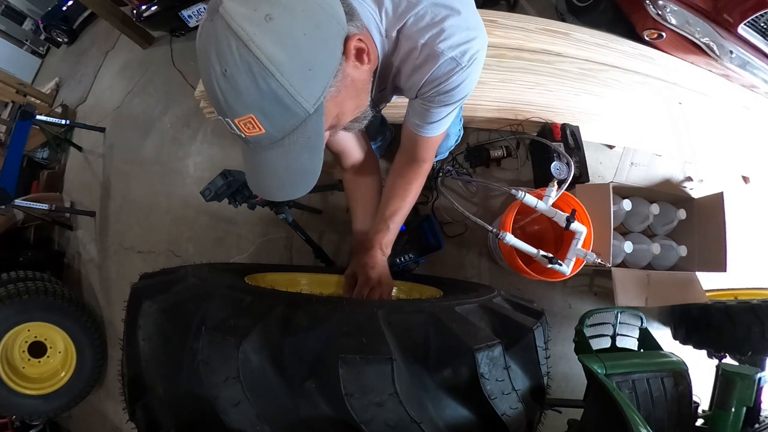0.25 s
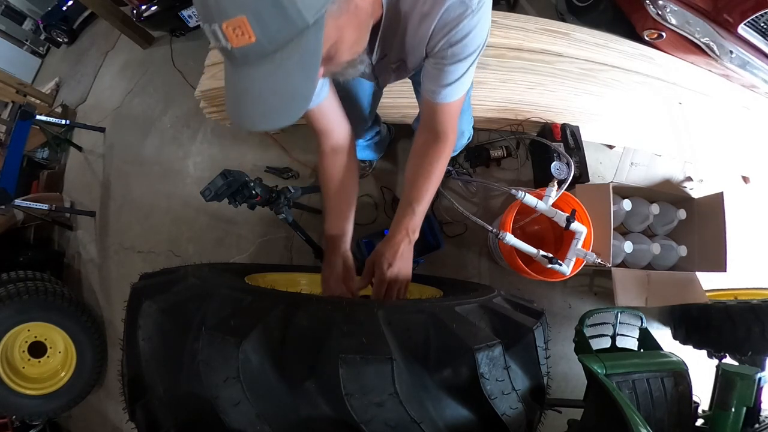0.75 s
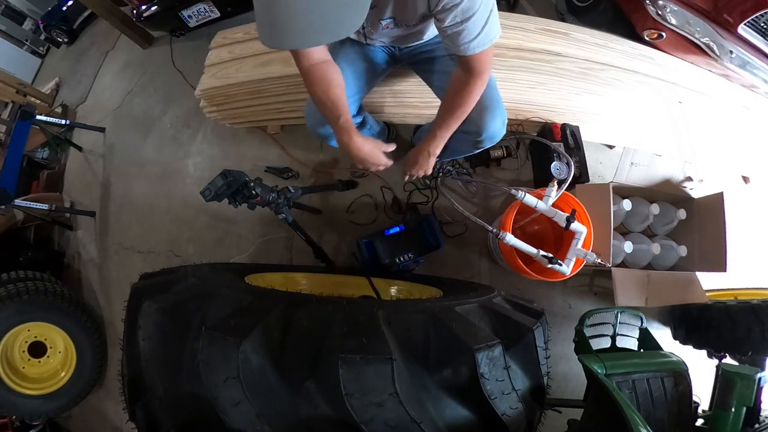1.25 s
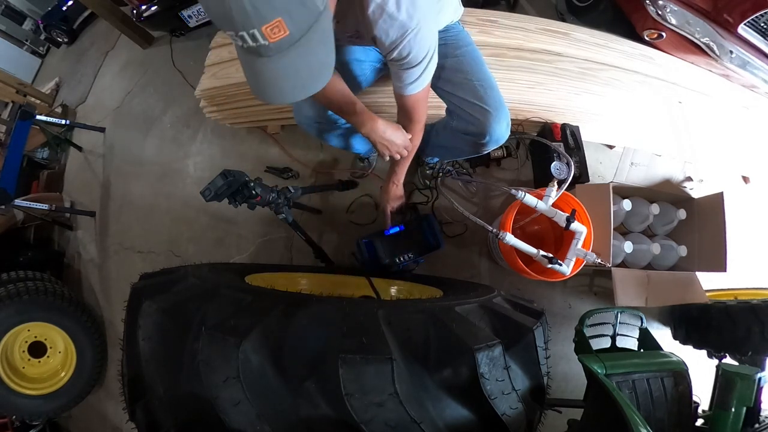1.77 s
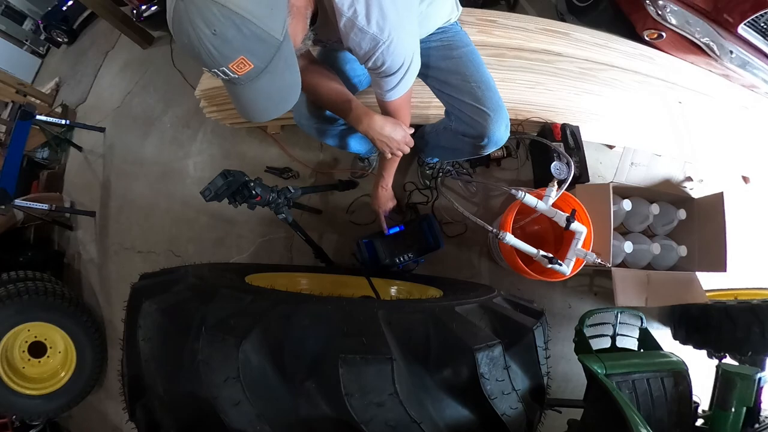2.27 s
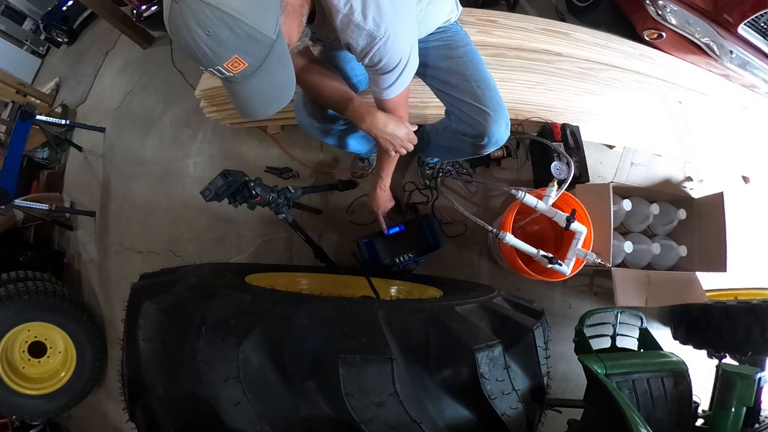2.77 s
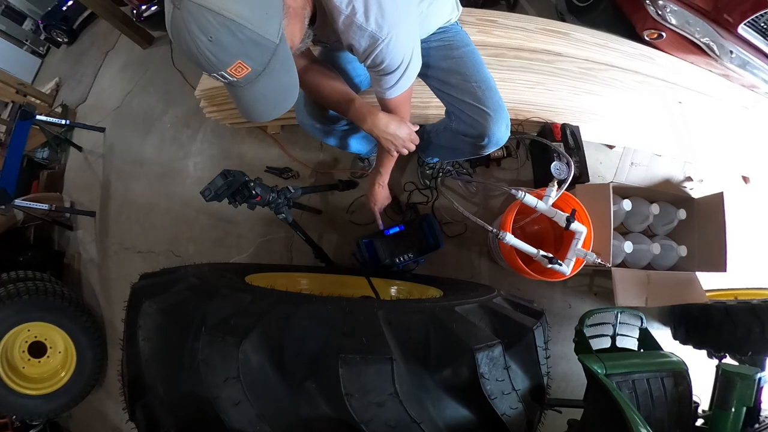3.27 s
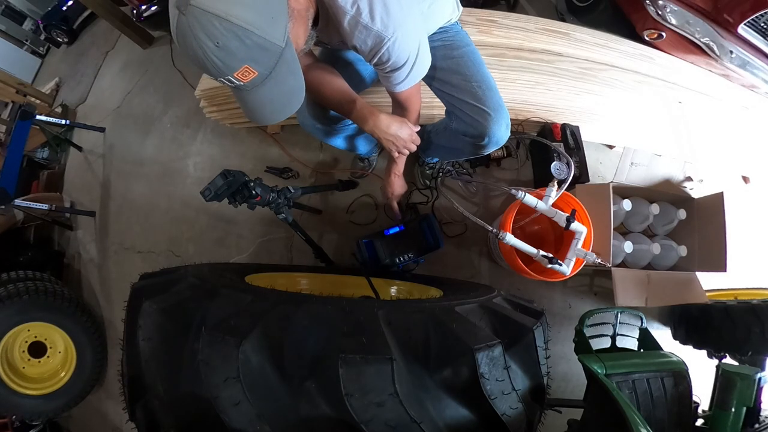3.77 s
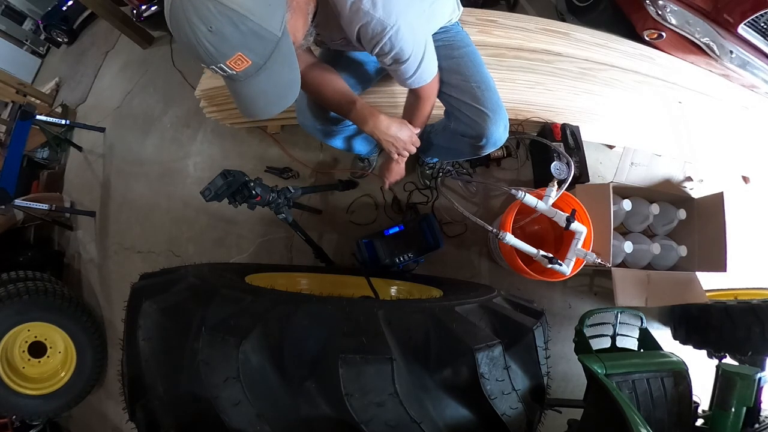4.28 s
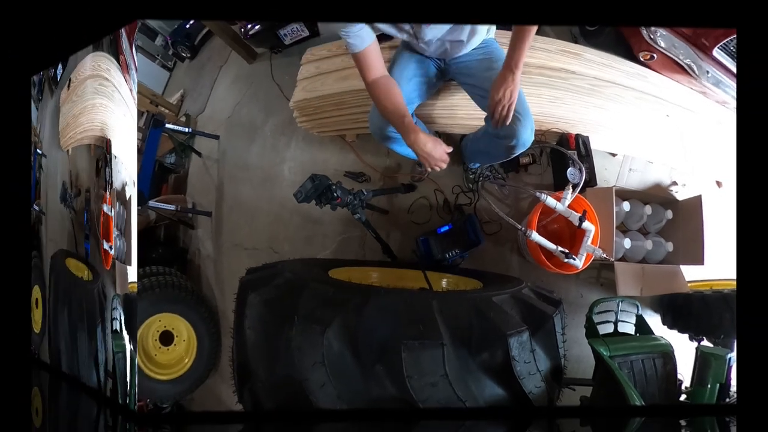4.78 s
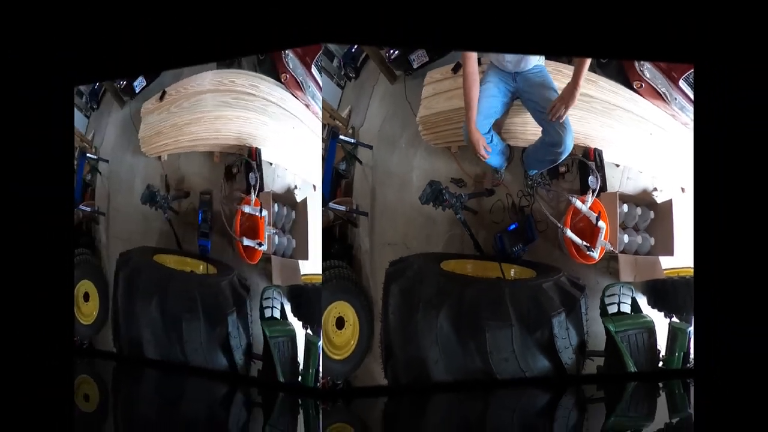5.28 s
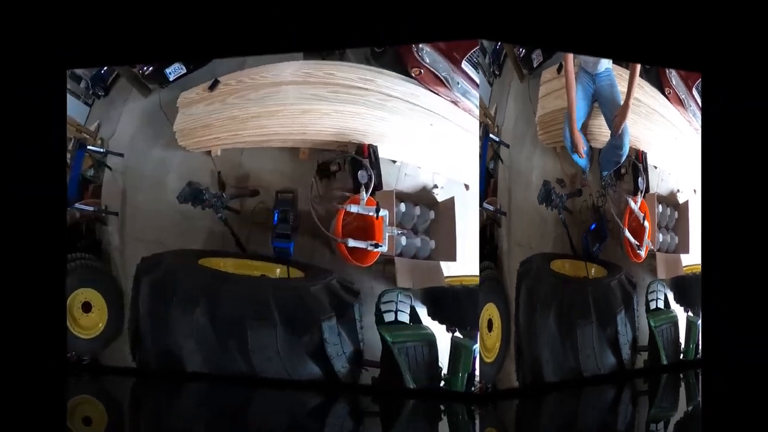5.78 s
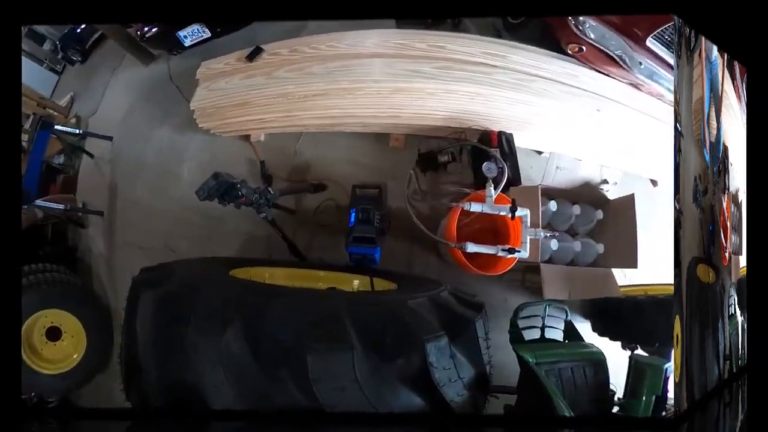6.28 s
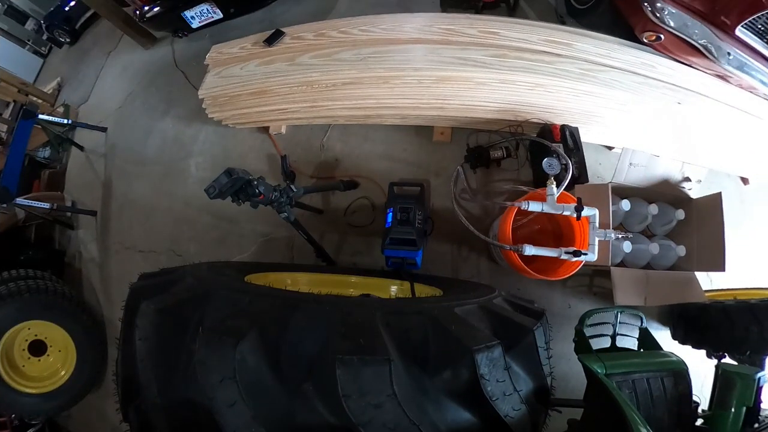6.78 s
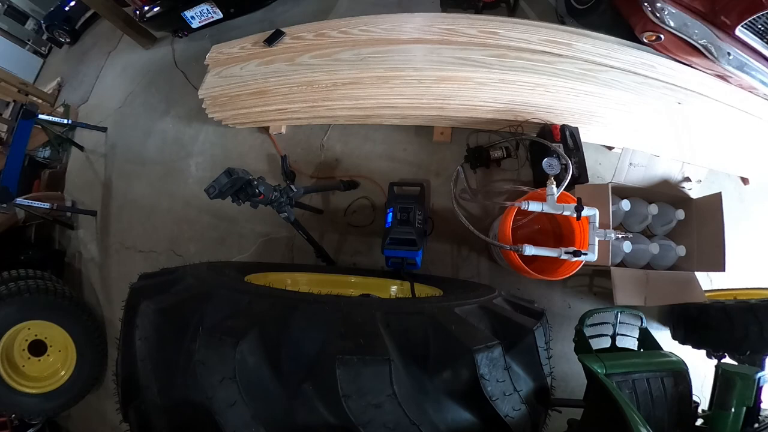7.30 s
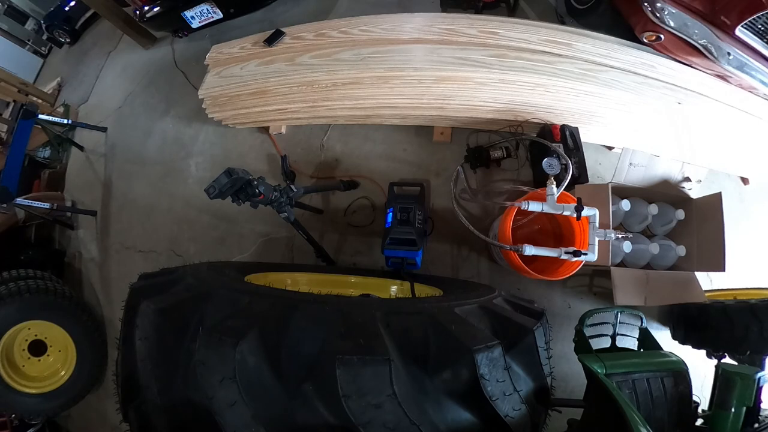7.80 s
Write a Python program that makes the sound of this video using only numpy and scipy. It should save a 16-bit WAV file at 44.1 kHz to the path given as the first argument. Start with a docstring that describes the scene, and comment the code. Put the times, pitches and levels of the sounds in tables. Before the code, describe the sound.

A quiet garage with low rumble, faint hiss and hums, heard by close stereo microphones. Small plastic clicks tick at 0.2 s and around 0.6-0.7 s; a firmer knock at 1 s leads into a short squeaky scrape of feet on concrete with cloth rustle. Dull, low bumps cluster at 1.5-1.6 s and more softly near 2.1 s with a click. Single button clicks follow at 2.5 and 2.75 s, with low rumble swells at 3.25 and 3.7 s. A loud snap at 4.05 s and switch clatter at 4.25 s start a small air pump, which surges up within a fraction of a second into a loud piston buzz, gear whine, valve puffs and rattle. From 4.5 to 6.4 s it crossfades to a slightly lower, steadier, loaded drone. At 7.5 s it switches off, gliding down to a stop just before 8 s, with a soft rustle.

```python
"""On a garage floor, close to two microphones, a small electric tire inflator is handled and dragged into place.
Its chuck, buttons and switch click as short bursts of plastic; feet squeak, clothes rustle and dull bumps ring.
It spins up and runs light; that spell dissolves into a slower one under load, which coasts to a stop.
The motor drives the piston through a 52-tooth gear: piston orders, gear whine, valve puffs and rattle
all follow the crank. A quiet garage with rumble, hiss and hums lies behind it throughout."""
import sys
import numpy as np
from scipy import signal
from scipy.fft import rfft, irfft
from scipy.io import wavfile
from scipy.ndimage import uniform_filter1d

SR = 44100
rng = np.random.default_rng(int(sys.argv[2]) if len(sys.argv) > 2 else 0)


def generate_wav(sig):
    """Save sig (samples, or channels by samples) to the path in sys.argv[1] as 16-bit PCM at SR."""
    pcm = np.round(np.clip(np.atleast_2d(sig).T, -1, 1) * 32767).astype(np.int16)
    wavfile.write(sys.argv[1], SR, pcm)


N = 355005
TIME = np.arange(N) / SR
BINS = np.fft.rfftfreq(N, 1 / SR)
GEAR_TEETH, PINION_TEETH = 52, 11

# difference between the two microphones: (frequency [Hz], side minus mid [dB])
MIC_WIDTH = [(100, -16), (250, -20.5), (450, -26.5), (1200, -16), (2500, -14.5), (5500, -14.5), (8300, -9),
             (12000, -11.5)]
# the light spell: (switched on [s], switched off [s], full crank speed [turns/s], one peak of compression [s])
LIGHT_RUN = (4.245, 5.36, 63, 4.343)


def amp(db):
    """Decibels to gain."""
    return 10 ** (np.asarray(db) / 20)


def unit(x, where=True):
    """Scales to rms 1, judged over the chosen moments."""
    return x / np.sqrt(np.mean(x ** 2, where=where) + 1e-20)


def read(points, hz):
    """Reads a spectrum on a log-frequency axis."""
    f, value = np.transpose(points)
    return np.interp(np.log(hz + 1), np.log(f + 1), value)


def colour(x, gain):
    """Filters by a gain for each frequency."""
    return irfft(rfft(x) * gain, N)


def resonances(modes):
    """Frequency response of a few steep-sided resonances."""
    return sum(amp(db) / (1 + 1j * (BINS - hz) / width) ** 2 for hz, width, db in modes)


def drift(hz):
    """Slow chance of rms 1, up to about the given rate."""
    return unit(colour(rng.standard_normal(N), np.exp(-(BINS / hz) ** 2)))


def noise(gain):
    """Coloured noise of rms 1 as the two microphones hear it."""
    mid, side = colour(rng.standard_normal((2, N)), gain)
    side = colour(side, amp(read(MIC_WIDTH, BINS)))
    return unit(np.array([mid + side, mid - side]))


def swell(s, half_s):
    """A smooth rise to 1 at time s, and the same fall after it."""
    return 1 / np.cosh(np.clip((TIME - s) / half_s, -20, 20))


def stroke(turns, width):
    """A swell once every turn, at whole turns."""
    return np.exp(-.5 * (((turns + .5) % 1 - .5) / width) ** 2)


def dissolve(start_s=4.54, length_s=1.82):
    """Share of the loaded spell in the mix, 0-1, growing evenly."""
    return np.clip((TIME - start_s) / length_s, 0, 1)


def garage(x, low_hz):
    """A diffuse tail, each band dying at its own speed, nearly the same at both microphones."""
    # reverberation of the garage: (frequency [Hz], t60 [s])
    decay = [(100, 0.42), (500, 0.52), (2000, 0.28), (5500, 0.41), (12000, 0.031)]
    hz, t, z = signal.stft(rng.standard_normal((2, SR // 2)), SR, nperseg=256)
    z = z * amp(-60 * t / read(decay, hz)[:, None]) * (t > .004)
    sides = z[1] * amp(read(MIC_WIDTH, hz))[:, None]
    mid, side = signal.istft(np.array([z[0], sides]), SR, nperseg=256)[1]
    tail = np.array([mid + side, mid - side]) / np.linalg.norm(mid)
    # little of the low end goes into the tail
    low_cut = 1 / np.sqrt(1 + (low_hz / (BINS + 1)) ** 4)
    return signal.fftconvolve(colour(x, low_cut), tail, axes=1)[:, :N]


def background(air_db=-39, rumble_db=-3.5, sink_db_per_s=5.5, waver_db=1.0, tone_hz=791, tone_db=-52):
    """Shaped noise makes low rumble and faint hiss; sines make wavering hums and one faint late tone."""
    # the quiet garage: (frequency [Hz], density [dB per Hz])
    air_spectrum = [(12, -11), (20, 3.5), (32, -21), (53, -3.5), (74, -3.5), (125, -12), (144, -10),
                    (201, -10), (332, -17), (439, -25.5), (648, -23), (880, -34), (1230, -30.5),
                    (5370, -37), (15500, -89.5)]
    # hums ahead of the rumble's changes: (frequency [Hz], level [dB])
    hum_tones = [(70, -42.5), (119, -48), (194, -53.5), (667, -61.5)]
    # brief swells of the rumble: (middle [s], half length [s], level [dB])
    rumble_swells = [(.65, 0.23, -6), (3.258, .08, -13), (3.704, 0.065, 0.5)]
    hums = 0
    for hz, db in hum_tones:
        tone = np.sin(2 * np.pi * hz * TIME + 0.58 * drift(5.7))
        hums = hums + amp(db) * np.sqrt(2) * tone * (1 + 0.2 * drift(17))
    air = amp(air_db) * noise(amp(read(air_spectrum, BINS))) + hums
    # the steady rumble sinks once the pump has started
    steady = amp(rumble_db - sink_db_per_s * np.maximum(TIME - LIGHT_RUN[0], 0))
    swells = sum(amp(db) * swell(s, half_s) for s, half_s, db in rumble_swells)
    rumble = (steady + swells) * amp(waver_db * drift(20))
    # this tone comes in with the loaded spell and lingers when the pump has stopped
    linger = amp(tone_db) * np.sqrt(2) * np.sin(2 * np.pi * tone_hz * TIME) * dissolve()
    return air + colour(air, BINS < 150) * (rumble - 1) + linger


def handling(flicker_db=1.1, squeak_sag=.08, break_loose_s=0.98):
    """Plastic feet squeak over concrete, higher the faster they slide, while clothes brush."""
    # resonances of the scraping feet: (frequency [Hz], half width at -6 dB [Hz], level [dB])
    feet = [(750, 53, 1.5), (1490, 240, 2.5), (1490, 66, 1)]
    # slides of the feet over concrete: (middle [s], half length [s], level [dB], pitch ratio [1])
    slides = [(1.093, 0.058, -32.5, 1.01), (1.303, 0.051, -45.5, .99), (1.453, 0.0322, -43, 1.01),
              (1.537, 0.067, -44.5, 1.1)]
    # movements that rustle clothes: (middle [s], half length [s], level [dB])
    rustles = [(0.953, 0.042, -49), (1.097, 0.072, -40.5), (1.36, 0.089, -58.5), (1.508, 0.076, -47.5),
               (7.965, 0.059, -40)]
    # colour of rustling clothes: (frequency [Hz], level [dB])
    cloth = [(400, -1), (2000, -5.5), (4000, 3), (5400, 5.5), (6200, -9), (7300, -1.5), (8500, -17.5),
             (11000, -26), (15000, -50)]
    judder, scrape = noise(resonances(feet)), 0
    for s, half_s, db, pitch in slides:
        speed = swell(s, half_s) * (TIME > break_loose_s)
        # reading the judder slower lowers the squeak when the feet barely move
        clock = np.cumsum(pitch * (1 - squeak_sag * (1 - speed))) / SR
        squeak = np.array([np.interp(clock, TIME, side) for side in judder])
        scrape = scrape + amp(db) * speed * squeak
    rustle = sum(amp(db) * swell(s, half_s) for s, half_s, db in rustles)
    return scrape + rustle * noise(amp(read(cloth, BINS))) * amp(flicker_db * drift(50))


def bumps():
    """The pump is set down and leant on: blows ring a few low modes, each blow with its own tilt."""
    # dull bumps: (time [s], level [dB], tilt [dB per octave])
    blows = [(1.466, -36.5, 8), (1.487, -14.5, -1.5), (1.533, -14, -6), (1.595, -16.5, -12.5),
             (2.031, -32, -9), (2.104, -21.5, -10), (2.166, -23.5, -13), (4.174, -49, 3)]
    # what the bumps ring: (frequency [Hz], level [dB], t60 [s])
    modes = [(22.8, -5, 0.67), (45.4, 7, 0.17), (98, 8, 0.18), (161, 8.5, 0.12), (211, -5, 0.16),
             (296, -5, 0.2), (377, -14, 0.18)]
    out, t = np.zeros(N), TIME[:SR // 2]
    for s, db, tilt_db in blows:
        ring = 0
        for hz, mode_db, t60 in modes:
            level_db = db + mode_db + tilt_db * np.log2(hz / 43)
            ring = ring + amp(level_db - 60 * t / t60) * np.sin(2 * np.pi * hz * t)
        soft_onset = 1 - np.exp(-t / 0.0038)
        out[round(s * SR):][:len(t)] += ring * soft_onset
    return out


def clicks(spread=0.13, snap=4.1, chatter_db=-2):
    """Each click is a hard snap and a short dying burst in one register of the plastic."""
    # clicks of the hose chuck, buttons, power switch and the drive taking up:
    # (time [s], level [dB], centre [Hz], width [octaves], t60 [s])
    events = [(0.198, -37, 1500, 1.6, 0.067), (.205, -27, 1880, 0.25, 0.022), (.206, -28, 664, 0.44, 0.054),
              (0.594, -39, 1300, 1.1, 0.054), (.697, -44, 7400, 0.56, 0.023), (.935, -36, 2000, 1.8, 0.051),
              (.984, -19, 600, 1.7, 0.026), (2.01, -33.5, 2040, 0.49, 0.055),
              (2.136, -20, 1560, 0.84, 0.02), (2.52, -24, 1630, 0.73, 0.026),
              (2.758, -26, 1750, 0.73, 0.024), (4.043, -32, 2200, 1.1, 0.066),
              (4.052, -8.5, 2230, 0.77, 0.026), (4.173, -32, 1740, 0.78, 0.083),
              (4.245, -21, 3150, 1.8, 0.13), (4.269, -13.5, 1490, 1.4, 0.085)]
    # ring of the plastic housing: (frequency [Hz], level [dB])
    plastic = [(150, 19.5), (500, 5), (750, -5.5), (1300, 3), (1800, -4.5), (2300, -3.5), (3000, -6),
               (3900, -5.5), (5500, -7.5), (6300, -20), (7500, -8), (9000, -22), (15000, -46)]
    out, t = np.zeros((2, N)), TIME[:SR // 4]
    f = np.fft.rfftfreq(len(t), 1 / SR)
    for s, db, hz, octaves, t60 in events:
        band = np.exp(-.5 * (np.log2((f + 1) / hz) / octaves) ** 2)
        register = unit(band * amp(read(plastic, f)))
        # minimum phase: nothing rings before the snap
        both_halves = np.concatenate([register, register[:0:-1]])[:len(t)]
        log_gain = np.log(both_halves + 1e-5)
        ring = np.fft.ifft(np.exp(np.conj(signal.hilbert(log_gain)))).real
        burst = rng.standard_normal((2, len(t))) * amp(db + chatter_db - 60 * t / t60)
        burst[0, 0] += snap * amp(db)
        mid, side = signal.fftconvolve(burst, ring[None], axes=1)[:, :len(t)]
        out[:, round(s * SR):][:, :len(t)] += [mid + spread * side, mid - spread * side]
    return out


def crank(on_s, off_s, full_hz, top_s, flutter=0.00066):
    """Crank speed and angle through spin-up, hold and coasting; whole turns are peaks of compression."""
    # most of the speed comes in a quick surge, the rest creeps in
    surge_s, creep_s, creep_share = .075, .172, .28
    # drag slows the crank in proportion to its speed, friction at a steady rate
    drag_s, friction_hz_per_s = .36, 72
    driven, coasting = np.maximum(TIME - on_s, 0), np.maximum(TIME - off_s, 0)
    missing = (1 - creep_share) * np.exp(-driven / surge_s) + creep_share * np.exp(-driven / creep_s)
    hz = full_hz * (1 - missing)
    drag = np.exp(-coasting / drag_s)
    hz = np.maximum(hz * drag - friction_hz_per_s * drag_s * (1 - drag), 0) * (driven > 0)
    hz = hz * (1 + flutter * drift(29.4))
    turns = np.cumsum(hz) / SR
    return hz, turns - np.interp(top_s, TIME, turns)


def slack(hz, full=100):
    """Backlash, 0-1: the drive runs loose while its speed changes fast."""
    change_per_s = abs(np.gradient(hz)) * SR
    return np.clip(uniform_filter1d(change_per_s / full, size=1500), 0, 1)


def inrush(full_s=5.04, fill_s=0.029):
    """Free flow of air into the hose, 1 at the start, 0 once the hose is full."""
    return .5 - .5 * np.tanh((TIME - full_s) / fill_s)


def efforts(hz, layers):
    """Gain of each layer: it builds over the first turn, follows the speed and changes with backlash."""
    # growth of piston, gear whine, valve puffs and rattle: [power of the crank speed]
    speed_powers = [2.16, 0.97, 0.16, 0.91]
    first_turn, speed, loose = np.minimum(np.cumsum(hz) / SR, 1), hz / hz.max(), slack(hz)
    return [first_turn * speed ** power * amp(db + loose_db * loose)
            for (db, loose_db), power in zip(layers, speed_powers)]


def valves(hz, turns, slap_db=3, leak=0.15, width=0.22, inrush_db=4):
    """A puff of air once a turn; during the inrush or with backlash a slap also rings the chamber."""
    # air chamber rung by the valves: (frequency [Hz], half width at -6 dB [Hz], level [dB])
    air_chamber = [(425, 37, 2.5), (479, 140, 9), (554, 31, 7)]
    chamber, turning, flow = resonances(air_chamber), hz > 0, inrush()
    puffs = noise(chamber) * unit(leak + stroke(turns - .5, width), turning)
    # one impulse as each turn passes the same angle
    passed = np.floor(turns - .35)
    slaps = unit(colour(np.diff(passed, prepend=passed[0]), chamber), turning)
    share = amp(slap_db) * np.maximum(slack(hz), flow)
    return amp(inrush_db * flow) * (puffs + share * slaps) / np.sqrt(1 + share ** 2)


def gears(hz, turns, width, octave_db, sag, loose_jitter, rough=0.048, tooth_error=0.33, jitter=0.053):
    """The teeth sing during each compression, which also slows the crank a little."""
    # how the casing radiates gear whine: (frequency [Hz], level [dB])
    casing = [(300, -3), (900, 4.5), (1400, 15), (1900, 3), (2400, 1), (2850, -8.5), (3250, 2.5),
              (3700, 13), (4600, 10), (5200, 7), (5750, -2.5), (6000, -15.5), (9000, 14)]
    # uneven teeth repeat their pattern every turn; backlash adds chance to it
    uneven = unit(sum(np.sin(2 * np.pi * (k * turns + rng.random())) for k in (2, 3, 5, 7)), hz > 0)
    wobble = tooth_error * uneven + (jitter + loose_jitter * slack(hz)) * drift(130)
    teeth = GEAR_TEETH * (2 * np.pi * turns - sag * np.sin(2 * np.pi * turns)) + wobble
    idle = .07  # share of the load that stays between compressions
    load = unit(idle + stroke(turns, width), hz > 0) * (1 + rough * drift(63))
    mesh = 0
    for k, db in ((1, 0), (2, octave_db)):
        mesh = mesh + amp(db + read(casing, k * GEAR_TEETH * hz)) * np.sin(k * teeth)
    return load * mesh


def rattling(turns, turning, loose, tilt_db, clatter, repeat_db=-8):
    """Noise of the loose linkage, knocked by the rod and the brushes."""
    # how the casing radiates rattle: (frequency [Hz], level [dB])
    rattle_spectrum = [(30, -13), (300, -9.5), (480, -7), (780, -6.5), (1050, -2.5), (1450, 3),
                       (1750, -5.5), (1950, -3), (2300, -7.5), (2650, -1.5), (3500, -4.5), (5150, -2),
                       (5750, -5), (6150, -19), (7300, -8.5), (8500, -27.5), (11500, -39), (15500, -52)]
    body = amp(read(rattle_spectrum, BINS) + tilt_db * np.log2(1 + BINS / 1500))
    # part of the rattle is the same on every turn, the rest is chance
    repeated = np.interp(turns % 1, np.linspace(0, 1, 700), rng.standard_normal(700))
    linkage = unit(noise(body) + amp(repeat_db) * unit(colour(repeated, body), turning), turning)
    # the rod knocks twice a turn, one broad strong knock and one short weak one
    rod = stroke(turns - .42, 0.12) + 0.11 * stroke(turns + 0.27, 0.02)
    # the brushes chatter with the motor shaft
    brushes = 0.26 * stroke(turns * GEAR_TEETH / PINION_TEETH, 0.16)
    flicker = amp((0.47 + 2.9 * loose) * drift(41))
    return linkage * unit(1 + clatter * (rod + brushes), turning) * flicker


def piston(turns, orders, loose, loose_whine_db=5, scatter=0.87, waver=0.14):
    """A suction pulse each turn, spread in time by the housing, plus motor whine that swells with backlash."""
    # motor whine: (multiple of the motor shaft speed [1], level against the piston tone [dB])
    motor = [(4, -14.5), (5, -31), (8, -25)]
    tone, whine = 0, 0
    for k, db in orders:
        phase = 2 * np.pi * k * (turns - .4) + scatter * rng.standard_normal()
        tone = tone - amp(db) * np.cos(phase)
    shaft = turns * GEAR_TEETH / PINION_TEETH
    for k, db in motor:
        whine = whine + amp(db) * np.sqrt(2) * np.sin(2 * np.pi * k * shaft) * (1 + waver * drift(8.2))
    tone_rms = np.sqrt(sum(amp(db) ** 2 for k, db in orders) / 2)
    return tone / tone_rms + whine * amp(loose_whine_db * loose)


def pump(run, layers, orders, gear_width, octave_db, sag, loose_jitter, tilt_db, hiss_db, clatter,
         shake=0.0084, room_db=-10, inrush_db=0.5):
    """One spell of running: piston tone, gear whine, valve puffs and linkage rattle, with a thin hiss."""
    # narrow bands of hiss from the rushing air: (frequency [Hz], half width at -6 dB [Hz], level [dB])
    hiss_bands = [(2600, 54, 5), (5090, 84, 0)]
    hz, turns = crank(*run)
    tone, whine, puff, rattle = efforts(hz, layers)
    loose, turning = slack(hz), hz > 0
    shaken = turns + shake * loose * drift(43)
    hum = tone * amp(inrush_db * inrush()) * piston(shaken, orders, loose)
    linkage = rattling(turns, turning, loose, tilt_db, clatter)
    hiss = amp(hiss_db) * noise(resonances(hiss_bands))
    racket = whine * gears(hz, turns, gear_width, octave_db, sag, loose_jitter)
    racket = racket + puff * valves(hz, turns) + rattle * (linkage + hiss)
    # the room blurs the racket, and the tone too while it glides
    return hum + racket + amp(room_db) * garage(racket + loose * hum, low_hz=400)


def standing_wave(x):
    """The microphones sit in a null of the room, which the rising second order sweeps through."""
    null_hz, half_width_hz = 121, 2.2
    return colour(x, 1 - 1 / (1 + 1j * (BINS - null_hz) / half_width_hz))


def scene():
    """Handling, then the two spells of the pump, in the garage."""
    # the loaded spell, spun up unheard before the dissolve:
    # (switched on [s], switched off [s], full crank speed [turns/s], one peak of compression [s])
    loaded_run = (0, 7.508, 55.9, 7.66)
    # piston tone of each spell: (multiple of the crank speed [1], level [dB])
    light_orders = [(1, -1), (2, 3.5), (3, -8.5), (4, -0.5), (5, -15), (6, -7.5), (7, -0.5), (8, -9),
                    (9, -4.5), (10, -4), (11, -27.5), (12, -19), (13, -24), (14, -23), (15, -16), (16, -9),
                    (17, -10), (18, -11), (19, -6.5), (20, -42), (21, -44), (22, -18), (23, -29), (24, -21),
                    (25, -10)]
    loaded_orders = [(1, -14.5), (2, 0), (3, -12), (4, -9.5), (5, -9.5), (6, -12.5), (7, -6), (8, -37.5),
                     (9, -18.5), (10, -3.5), (11, -73), (12, -16.5), (13, -27), (14, -30), (15, -22),
                     (16, -23), (17, -34), (18, -31), (19, -15), (20, -19), (21, -13), (22, -24.5),
                     (23, -39), (24, -18.5), (25, -17.5), (26, -26), (27, -13.5)]
    # piston, gear whine, valve puffs, rattle: (level [dB], change while the drive runs loose [dB])
    light_layers = [(-13, 0), (-18, -5.5), (-26.5, 8), (-17, 1.5)]
    loaded_layers = [(-11.5, -5), (-16.5, -6), (-34, 11.5), (-19.5, -1.5)]
    light = pump(LIGHT_RUN, light_layers, light_orders, gear_width=0.14, octave_db=-5.5, sag=0.02,
                 loose_jitter=1.3, tilt_db=0.1, hiss_db=-15, clatter=0.51)
    loaded = pump(loaded_run, loaded_layers, loaded_orders, gear_width=0.081, octave_db=-7.0, sag=0.011,
                  loose_jitter=1.0, tilt_db=-1.7, hiss_db=-21, clatter=0.52)
    running = (1 - dissolve()) * light + dissolve() * loaded
    small = clicks() + handling() + bumps()
    return standing_wave(running) + small + amp(-8.5) * garage(small, low_hz=150) + background()


def record(dry):
    """Peaks are rounded off smoothly near full scale; then the band limit."""
    knee, headroom, smooth_hz, edge_hz = .7, .22, 7500, 15600
    over = np.maximum(abs(dry) - knee, 0)
    excess = np.sign(dry) * (over - headroom * np.tanh(over / headroom))
    held = dry - colour(excess, np.exp(-(BINS / smooth_hz) ** 4))
    band_limit = signal.firwin(511, edge_hz, window=("kaiser", 9), fs=SR)
    return signal.oaconvolve(held, band_limit[None], "same")


dry = scene()
out = record(dry)
generate_wav(out)
```